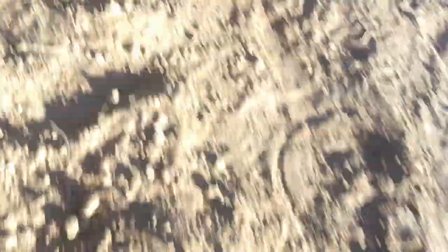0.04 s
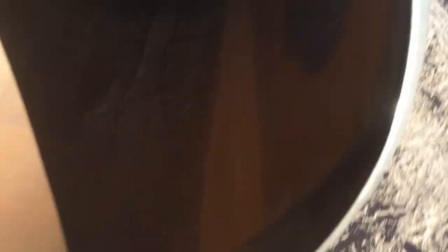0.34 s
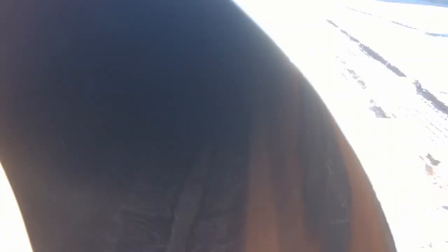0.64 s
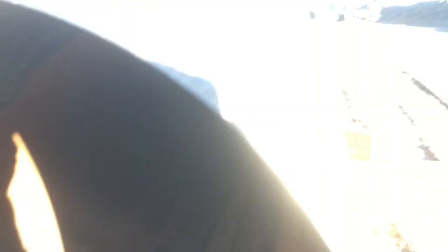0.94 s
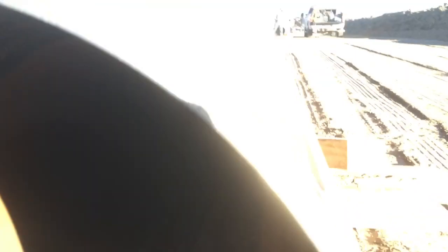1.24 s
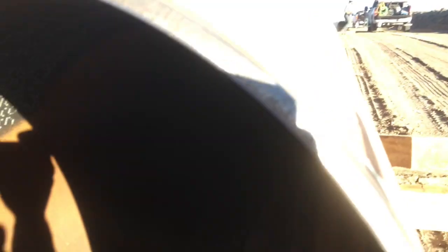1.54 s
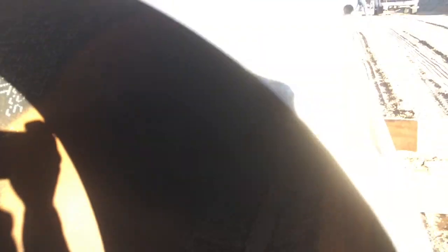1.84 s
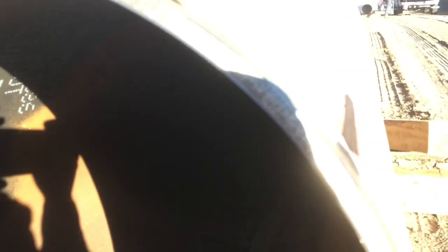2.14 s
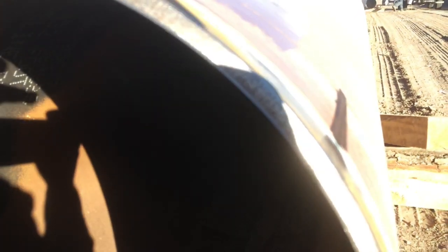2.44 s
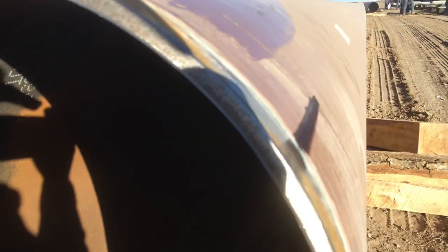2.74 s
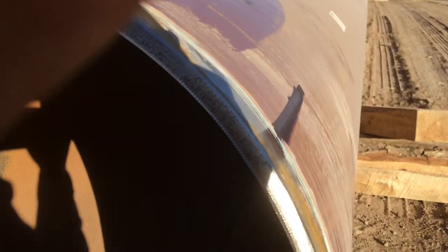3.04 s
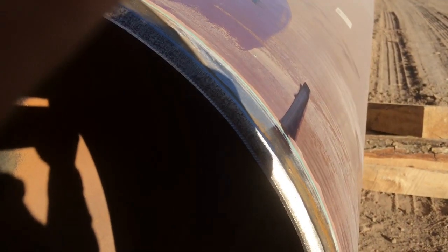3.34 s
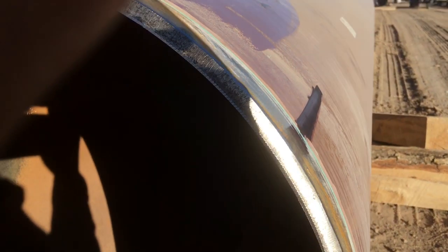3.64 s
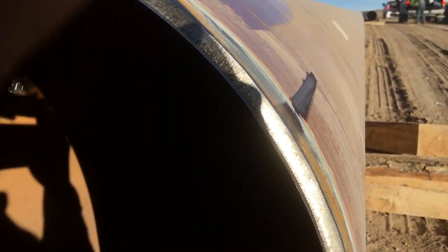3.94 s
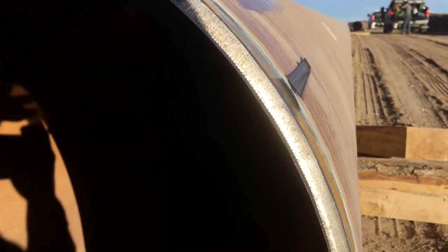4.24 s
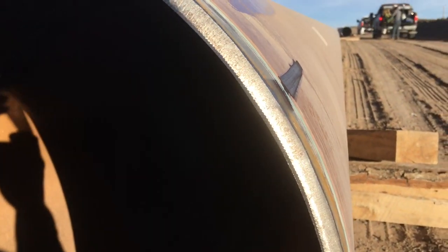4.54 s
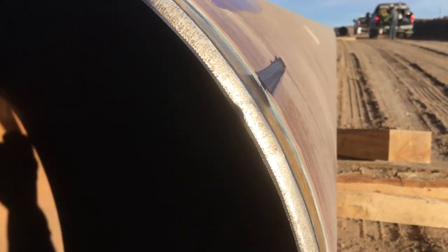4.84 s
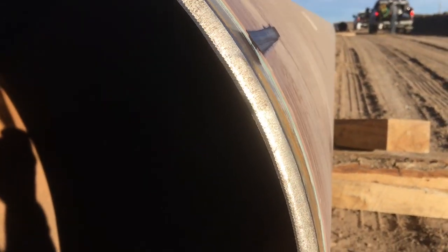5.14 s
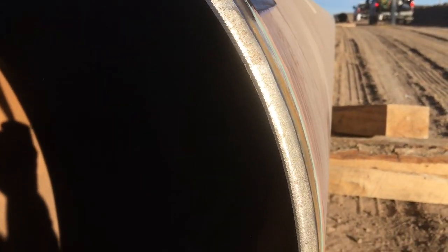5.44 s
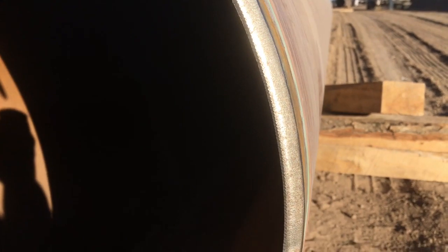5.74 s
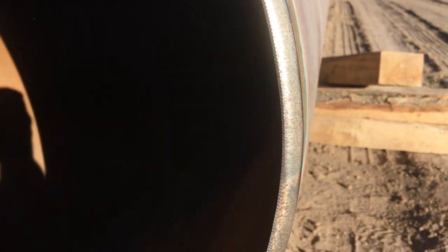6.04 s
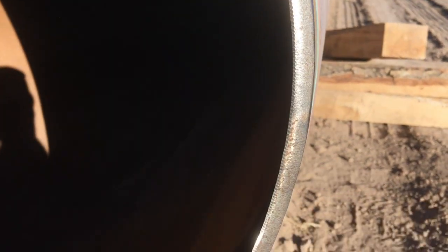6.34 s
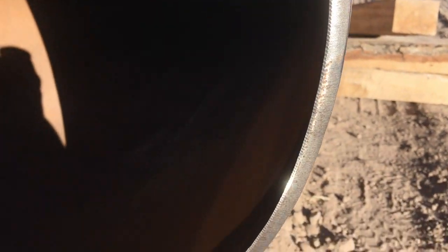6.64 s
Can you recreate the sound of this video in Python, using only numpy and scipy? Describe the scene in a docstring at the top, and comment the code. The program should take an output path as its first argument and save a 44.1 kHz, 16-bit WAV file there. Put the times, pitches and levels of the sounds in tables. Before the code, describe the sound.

Engines drone outdoors as an angle grinder coasts, rattles back up to speed, scrapes its wire wheel along steel pipe, then spins free.

```python
"""On an open-air worksite, a diesel generator drones and beats against a second, slower engine.
An angle grinder coasts down, is switched on again and rattles up to speed, then buffs the sloping
edge of a steel pipe. Its wire wheel scrapes nearly the same pattern every turn and the pipe rings
with it; lifted off, the motor speeds up again. The phone's gain control turns everything down
during the screech, so the drone sinks beneath it."""
import sys
import numpy as np
from scipy import signal
from scipy.fft import rfft, irfft, next_fast_len
from scipy.io import wavfile
from scipy.ndimage import uniform_filter1d, minimum_filter1d, map_coordinates

SR = 44100
rng = np.random.default_rng(int(sys.argv[2]) if len(sys.argv) > 2 else 0)


def inscribe(sig):
    """Save sig as 16-bit PCM at rate SR to the path in sys.argv[1].

    A 1-D sig is mono; a 2-D sig holds one channel per row.
    Samples are clipped to [-1, 1] before scaling.
    """
    pcm = np.round(np.clip(np.atleast_2d(sig).T, -1, 1) * 32767)
    wavfile.write(sys.argv[1], SR, pcm.astype(np.int16))


N = 303849
ON_S, LAND_S, LIFT_S = 3.066, 4.066, 5.93  # switch on, wheel onto the pipe, wheel off it
FREE_SPEED = 132.36  # turns per second that the unloaded wheel heads for
TOP_HZ = 15750

# pitches at which the gear case rings: f/Hz, width/Hz, level/dB
GEAR_CASE = [(1252, 170, -11.5), (1890, 730, -18), (2563, 350, 0.5), (3440, 470, -3.5), (4530, 740, -15),
             (6150, 2600, -16)]
# pitches at which the air vents ring: f/Hz, width/Hz, level/dB
VENTS = [(4860, 6200, 0), (6400, 1800, 6), (8650, 1900, 1), (9460, 640, 0), (11080, 1000, 1.5),
         (12150, 1500, -1.5), (14300, 2800, -8.5)]


def amp(db):
    """Turn decibels into a gain to multiply by."""
    return np.exp(np.maximum(db, -200) * (np.log(10) / 20))


def unit(x):
    """Scale x to an average strength (rms) of 1."""
    return x / np.sqrt(np.mean(x ** 2) + 1e-20)


def steady(x):
    """Hold the strength of x near 1 all along."""
    return x / np.sqrt(np.abs(uniform_filter1d(x ** 2, size=6000)) + 1e-9)


def clock():
    """The time of each sample in seconds."""
    return np.arange(N) / SR


def curve(rows, column=1):
    """Join the points of a table with straight lines over time."""
    rows = np.asarray(rows)
    return np.interp(clock(), rows[:, 0], rows[:, column])


def ramp(start, takes):
    """Rise from 0 to 1; both times are in seconds."""
    return np.clip((clock() - start) / takes, 0, 1)


def wobble(rate):
    """A smooth curve through `rate` random points a second."""
    knots = rng.standard_normal(int(N * rate / SR) + 4)
    place = np.arange(4 * len(knots)) / 4
    return np.interp(clock() * rate, place, map_coordinates(knots, [place], order=2))


def blur(width_hz):
    """A random gain and phase that smear a tone to about this width."""
    return (wobble(width_hz) + 1j * wobble(width_hz)) / np.sqrt(2)


def grit(rough_db, rate):
    """Noise that comes in random clumps."""
    return rng.standard_normal(N) * amp(rough_db * wobble(rate))


def filtered(x, response):
    """Scale each frequency in x by response(hz)."""
    size = next_fast_len(N + 8192)
    return irfft(rfft(x, size) * response(np.fft.rfftfreq(size, 1 / SR) + 1e-3), size)[:N]


def coloured(x, points):
    """Shape x to a spectrum (f/Hz, level/dB), at strength 1."""
    f, db = np.transpose(points)
    return unit(filtered(x, lambda hz: amp(np.interp(np.log(hz), np.log(f), db))))


def resonate(x, modes):
    """Make x ring at some pitches (f/Hz, width/Hz, level/dB), at strength 1."""
    f = np.arange(1, SR / 2, 2)
    power = sum(amp(db) ** 2 / (1 + ((f * f - centre * centre) / (f * width)) ** 2) ** 2
                for centre, width, db in modes)
    return unit(filtered(x, lambda hz: np.interp(hz, f, np.sqrt(power))))


def engine(overtones, firing_hz, waver):
    """An engine's exhaust pulses make a stack of slightly wavering tones."""
    angle = 2 * np.pi * firing_hz * clock() + waver * wobble(2.81)
    return sum(np.sqrt(2) * amp(db) * np.sin(k * (angle + 0.014 * wobble(25)) + rng.uniform(0, 2 * np.pi))
               for k, db in overtones)


def worksite(firing_hz=60.0, slower_hz=49.6):
    """Two engines beat together over clatter, hiss and a cooling fan's whistle."""
    # exhaust tones of each engine: multiple of the firing rate, level/dB
    generator = [(1, 0.5), (1.5, -23), (2, -13.5), (2.5, -49), (3, -20), (3.5, -19.5), (4, -23.5),
                 (5, -30.5), (8, -36.5)]
    slower = [(1, -14.5), (2, -22.5), (3, -25), (6, -30)]
    # spectra of the engine clatter and the site's hiss: f/Hz, level/dB
    clatter_shape = [(30, -34), (60, 2.5), (100, -3), (170, 10), (215, -0.5), (255, -1), (300, -16.5),
                     (450, -42)]
    hiss_shape = [(190, -29), (330, -3.5), (480, -1), (1050, -3.5), (1300, -9.5), (1800, -9), (2700, -11),
                  (3800, -14.5), (4900, -21), (5900, -19.5), (7700, -26.5), (9600, -24), (10400, -31),
                  (15500, -41)]
    # hiss compared with the drone: t/s, level/dB
    hiss_levels = [(0, -19), (2.25, -17.5), (2.6, -19), (6.89, -20.5)]
    tones = engine(generator, firing_hz, waver=0.077) + engine(slower, slower_hz, waver=0.29)
    firing = amp(2.4 * np.cos(2 * np.pi * firing_hz * clock()))
    clatter = amp(-12) * coloured(grit(rough_db=0.5, rate=47) * firing, clatter_shape)
    hiss = amp(curve(hiss_levels)) * coloured(grit(rough_db=0.83, rate=110), hiss_shape)
    fan = amp(-32.5) * resonate(rng.standard_normal(N), [(1421, 30, 0)])
    return amp(-18) * (amp(-0.5) * tones + clatter + hiss + fan)


def speed(first_speed=68, lost_per_s=18.3):
    """Wheel turns per second: friction slows it, the motor pulls it up, the pipe holds it back."""
    # the motor picks up speed: t/s, starting speed/(turns per s), lag/s
    run_ups = [(3.06, 12, .633), (5.92, 111, 1.575)]
    # the wheel drags on the pipe: t/s, speed/(turns per s)
    loaded = [(4.07, 114.4), (4.24, 116.25), (4.6, 116.05), (4.8, 115.2), (5.05, 113.3), (5.4, 111.75),
              (5.7, 111.3), (5.85, 110.6), (5.92, 111)]
    t = clock()
    rate = first_speed - lost_per_s * t
    for start, start_speed, lag in run_ups:
        shortfall = (FREE_SPEED - start_speed) / (1 + np.abs(t - start) / lag) ** 2
        rate = np.where(t < start, rate, FREE_SPEED - shortfall)
    return np.where((t > loaded[0][0]) & (t < loaded[-1][0]), curve(loaded), rate)


def turns():
    """How many turns the wheel has made so far."""
    return np.cumsum(speed()) / SR


def fading(db_per_s=31.5, from_s=0.34):
    """The falling gain of the coasting grinder."""
    return amp(-db_per_s * np.maximum(clock() - from_s, 0))


def powered():
    """1 once the switch is on."""
    return ramp(ON_S, .008)


def touching():
    """1 while the wheel is on the pipe."""
    return ramp(LAND_S, 0.0052) * (1 - ramp(LIFT_S, 0.02))


def loudness(db, per_doubling_db, coast_db, swells=()):
    """A part gets louder with speed and, under power, swells where it meets a resonance."""
    rate = speed()
    swell_db = sum(added * np.exp(-((rate - at) / width) ** 2) for at, width, added in swells)
    speed_gain = amp(db + per_doubling_db * np.log2(rate / FREE_SPEED))
    return speed_gain * (powered() * amp(swell_db) + amp(coast_db) * fading())


def coasting():
    """With the power off, gears and bearings whirr down and ring the grinder's shell."""
    # gear and bearing tones: multiple of the wheel speed, level/dB
    whirr_tones = [(25, -2.5), (45, 2), (60, -9.5), (72, -9), (90, -6)]
    # pitches of the shell: f/Hz, width/Hz, level/dB
    shell = [(1670, 460, -1.5), (2790, 510, 0), (3960, 910, 6.5), (5900, 1000, -18)]
    angle = 2 * np.pi * turns()
    tones = sum(amp(db) * np.exp(1j * k * angle) * blur(430) for k, db in whirr_tones)
    level = amp(-27) * fading(db_per_s=25) * (1 - ramp(start=0.8, takes=.45))
    return level * steady(resonate(tones.real, shell))


def grinder():
    """Motor noise, gears and cooling air shake with each turn, beside the motor's tones."""
    # pitches of the motor housing: f/Hz, width/Hz, level/dB
    housing = [(990, 730, -6.5), (1850, 490, -1), (2265, 260, 4.5), (3050, 440, 7), (3990, 990, 0.5),
               (5560, 2900, -3.5), (7200, 800, -24)]
    angle = 2 * np.pi * turns()
    shake = amp(0.97 * wobble(35) + 0.43 * np.cos(angle))
    motor = resonate(grit(rough_db=0, rate=370), housing)
    motor *= loudness(-20.5, per_doubling_db=3.1, coast_db=-4.5)
    rattle = gear_rattle()
    air = resonate(grit(rough_db=2, rate=690), VENTS)
    air *= loudness(-22.5, per_doubling_db=5, coast_db=-8.5)
    return shake * (motor + rattle + air + gear_whine(angle)) + motor_tones(angle)


def gear_rattle():
    """The gears chatter softly when coasting, hard under the starting pull, then settle."""
    # chatter under power: t/s, relative level/dB
    chatter = [(3.07, -20.5), (3.25, -11), (3.31, -10), (3.345, -25), (3.5, -20), (4.1, -21), (4.5, -28)]
    level = powered() * amp(curve(chatter) + 1.5) + amp(-30) * fading()
    return level * resonate(grit(rough_db=2.5, rate=250), GEAR_CASE)


def gear_whine(angle, teeth=45):
    """Gear teeth meet unevenly, so each tone is a narrow core in a wide smear."""
    # gear tones: multiple of the tooth rate, level/dB
    overtones = [(1, 4), (2, -1.5), (3, -4), (4, -7)]
    # pitches the teeth excite in the gear case: f/Hz, width/Hz, level/dB
    case_ring = [(2780, 390, 3.5), (3500, 500, 1.5), (4540, 460, -0.5), (5200, 220, -7), (5820, 680, 4.5),
                 (6900, 900, 0.5), (9250, 4800, -8)]
    # where the whine swells: speed/(turns per s), width/(turns per s), boost/dB
    swells = [(75.6, 13.4, 11), (100, 10.2, 10), (116.2, 2.34, 8.5)]
    core_share = np.interp(clock(), [3.5, 6.1, 6.5], [.25, .65, .15])
    core, smear = np.sqrt(core_share), np.sqrt(1 - core_share)
    tones = sum(amp(db) * np.exp(1j * k * teeth * angle) * (core * blur(220) + smear * blur(1300))
                for k, db in overtones)
    whine = steady(resonate(tones.real * amp(2.3 * wobble(160)), case_ring))
    level = loudness(-25.5, per_doubling_db=2.4, coast_db=-6, swells=swells)
    return amp(-7.2 * touching()) * level * whine


def motor_tones(angle, gear_ratio=4.842, bars=24):
    """The rotor hums, turning faster than the wheel, and its contact bars whine."""
    # where the whine swells: speed/(turns per s), width/(turns per s), boost/dB
    swells = [(85, 3.3, 21.5), (107, 13, 7.7)]
    rotor = gear_ratio * angle
    hum = unit(np.sin(rotor + 0.15 * wobble(40)) * amp(0.91 * wobble(22)))
    hum *= loudness(-46.5, per_doubling_db=3, coast_db=4.1)
    whine = unit(np.sin(bars * rotor + 1.1 * wobble(220)) * amp(2 * wobble(60) + 2 * wobble(9)))
    whine *= loudness(-37, per_doubling_db=2, coast_db=-6, swells=swells)
    lower_hum = unit(np.sin(rotor - angle + .5 * wobble(40)))
    lower_hum *= loudness(-55, per_doubling_db=2, coast_db=-8, swells=[(108, 13, 13.6)])
    return hum + lower_hum + whine


def growl(surge_db=-23.5, running_db=-28.5, free_db=-40.5, coast_db=-35.5):
    """The motor growls most with its starting current, and stirs the air inside the pipe."""
    # spectrum of the growl: f/Hz, level/dB
    growl_shape = [(150, -32), (370, -1), (450, -5), (700, -3.5), (1000, -3.5), (1300, -5.5), (1800, -4),
                   (2600, -19.5)]
    # pitches of the air in the pipe: f/Hz, width/Hz, level/dB
    pipe_air = [(364, 60, -6.5), (435, 23, 2.5), (573.6, 7.7, 3.5)]
    db = surge_db + (running_db - surge_db) * ramp(start=3.32, takes=0.021)
    db += (free_db - running_db) * ramp(LAND_S, 2.3)
    level = powered() * amp(db) + fading() * amp(coast_db)
    motor = level * coloured(grit(rough_db=0, rate=110), growl_shape)
    return motor + powered() * amp(-41) * resonate(rng.standard_normal(N), pipe_air)


def sparks(pulse_hz=120, pulse_db=7, fall_db_per_s=2):
    """The motor's carbon brushes spit twice per mains cycle, fading after the switch-on."""
    # pitches of the sparking: f/Hz, width/Hz, level/dB
    spark_ring = [(9600, 640, -3), (11970, 550, 1)]
    spitting = grit(rough_db=5, rate=150) * amp(pulse_db * np.cos(2 * np.pi * pulse_hz * clock()))
    level = powered() * amp(-31.5 - fall_db_per_s * np.abs(clock() - ON_S))
    return level * resonate(spitting, spark_ring)


def knocks(ring_s=0.05, crack_s=0.012):
    """The gears knock across the slack between their teeth: a bright crack, then the case rings."""
    # gear knocks: t/s, relative level/dB
    hits = [(3.0664, -14.5), (3.1972, -11), (3.3423, -1.5), (3.3847, -2), (3.4334, -0.5), (3.444, -8.5),
            (3.7092, 0.5), (3.7204, -11), (3.7634, -2), (6.5692, -13), (6.6574, -16)]
    t, ring, crack = clock(), np.zeros(N), np.zeros(N)
    for start, db in hits:
        age = np.abs(t - start)
        ring += amp(db - 60 * age / ring_s) * (t >= start)
        crack += amp(db - 60 * age / crack_s) * (t >= start)
    case = resonate(rng.standard_normal(N), GEAR_CASE)
    bright = resonate(rng.standard_normal(N), VENTS)
    return amp(-5.5) * ring * case + amp(-11.5) * crack * bright


def wires(turned, lean_db=6, size=2048, overtones=140):
    """Random wire strikes, strongest where the wheel sticks out, repeat every turn."""
    place = np.arange(size) / size
    strikes = rng.standard_normal(size) * amp(lean_db * np.cos(2 * np.pi * place))
    spectrum = rfft(strikes)[1:overtones]
    one_turn = irfft(np.r_[0, spectrum / np.abs(spectrum)], size)  # all overtones equally loud
    return unit(np.interp(turned % 1, place, one_turn, period=1))


def wire_wheel():
    """The wheel's scraping force: a buzz that shifts as the bristles rearrange."""
    turned = turns()
    drift = 3 * clock() + .2 * wobble(9)
    dragged = turned + 0.0008 * wobble(45)  # uneven drag blurs the highest overtones
    pattern = np.cos(drift) * wires(dragged) + np.sin(drift) * wires(dragged)
    loose = unit(grit(rough_db=2.5, rate=680) * amp(2.1 * np.cos(2 * np.pi * turned)))
    # the wheel skips as it lands and as it leaves
    skip = np.interp(clock(), [4.07, 4.4, 5.6, 5.9], [.9, .45, .4, 2])
    return (pattern + skip * loose) / np.sqrt(1 + skip ** 2) * amp(0.41 * wobble(30))


def pipe(force):
    """The steel pipe rings under the wheel, at new pitches once the wheel slides along."""
    # pipe pitches at the first spot, at the later spot, and low down: f/Hz, width/Hz, level/dB
    first_spot = [(2520, 690, -11), (3286, 470, 0), (3732, 38, 4.5), (3988, 257, -8), (4300, 260, -1),
                  (4790, 190, -2.5), (5460, 220, -1.5), (5560, 630, -7.5), (6420, 680, -3), (6740, 374, -9),
                  (7300, 330, -6.5), (8310, 900, -2.5), (8940, 780, -3.5), (9910, 490, 0.5),
                  (10040, 390, -2), (10900, 500, -6), (11510, 370, 3), (12500, 500, -1), (13250, 500, 4),
                  (13720, 150, 0), (14330, 998, 0)]
    later_spot = [(2470, 780, -22), (2940, 300, -2.5), (3460, 220, 4), (3930, 150, 0), (4630, 240, 3),
                  (5400, 970, -2.5), (5880, 150, 6.5), (6750, 450, 0), (7240, 310, 7), (8390, 400, 2.5),
                  (9000, 600, -2), (9920, 450, 4), (10700, 610, -8), (11570, 290, -0.5), (12600, 700, -6),
                  (14700, 1200, -15)]
    low_pitches = [(467, 43, -8.5), (555, 12, -4), (910, 21.5, 4.5), (1035, 110, -6), (1335, 7.6, 1.5),
                   (1420, 39, -1.5), (1614, 71, -7)]
    # wheel on the pipe: t/s, ring level/dB, scrape against ring/dB, sizzle against ring/dB
    contact = [(4.08, -11.5, -2, -6), (4.19, -12.5, -1, -6), (4.3, -10.5, -3, -9), (4.53, -9.5, -1.5, -1.5),
               (4.7, -6, -0.5, -2.5), (4.88, -4, 3, -10), (5.35, -11, 3.5, -10), (5.52, -13.5, 0.5, -9),
               (5.9, -18.5, -6, -7)]
    slid = .92 * ramp(start=4.57, takes=.24)
    steel = np.sqrt(1 - slid) * resonate(force, first_spot) + np.sqrt(slid) * resonate(force, later_spot)
    steel = swelling(steel)
    edges_hz = [1500, 7600, 12300, TOP_HZ]
    ring, scrape, sizzle = [steady(filtered(steel, lambda hz: (hz >= low) & (hz < high)))
                            for low, high in zip(edges_hz, edges_hz[1:])]
    scrape *= amp(curve(contact, column=2))
    sizzle *= amp(curve(contact, column=3))
    buzz = amp(curve(contact)) * (ring + scrape + sizzle)
    low_ring = amp(-29) * resonate(force, low_pitches)
    return touching() * (buzz + low_ring) + singing(force)


def swelling(x, depth_db=1.5, rate=6, spacing_hz=260):
    """Groups of nearby pitches swell and fade at random as the wheel travels."""
    hz, t, spectrum = signal.stft(x, SR, nperseg=512)
    grid = np.meshgrid(hz / spacing_hz, t * rate, indexing="ij")
    swell = map_coordinates(rng.standard_normal((80, 80)), grid, mode="mirror")
    gain = amp(depth_db * swell * np.sqrt(hz[:, None] / 5000))  # deeper in the treble
    return signal.istft(spectrum * gain, SR, nperseg=512)[1][:N]


def singing(force, width_share=0.024):
    """Single pitches of the pipe sing out as the wheel passes."""
    # ringing notes: peak t/s, half length/s, f/Hz, level/dB
    notes = [(4.873, 0.23, 3410, -16.5), (4.78, 0.089, 5700, -15), (5.09, 0.1, 905, -29),
             (5.33, 0.083, 4560, -24), (5.36, 0.11, 3380, -18), (5.862, 0.12, 1330, -31)]
    sound = np.zeros(N)
    for peak, half_length, hz, db in notes:
        level = amp(db) * np.exp(-((clock() - peak) / half_length) ** 2)
        sound += level * steady(resonate(force, [(hz, width_share * hz, 0)]))
    return sound


def gain_control(x, ceiling_db=-9.5, hold_s=0.48, recovery_db_per_s=14, window=3001, treble_hz=8000):
    """Turn down when too loud, reacting most to treble; hold, then come back slowly."""
    sensed = filtered(x, lambda hz: np.hypot(1, hz / treble_hz))
    heard_db = 10 * np.log10(np.abs(uniform_filter1d(sensed ** 2, window, origin=window // 2)) + 1e-9)
    needed_db = np.minimum(ceiling_db - heard_db, 0)
    hold = int(hold_s * SR) | 1
    held_db = minimum_filter1d(needed_db, hold, origin=hold // 2, mode="nearest")
    recovery_db = recovery_db_per_s * clock()
    return x * amp(np.minimum.accumulate(held_db - recovery_db) + recovery_db)


def scene():
    """Everything is close and in the open air, with no echo."""
    return (grinder() + growl() + sparks() + coasting() + knocks() + pipe(wire_wheel()) + worksite())[None]


def record(dry):
    """The phone adjusts its gain, rounds off the highest peaks and cuts the top treble."""
    levelled = gain_control(dry[0])
    rounded = levelled / (1 + np.abs(levelled) ** 8) ** (1 / 8)
    return filtered(rounded, lambda hz: hz < TOP_HZ)[None]


dry = scene()
out = record(dry)
inscribe(out)
```